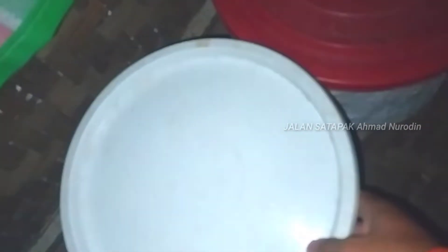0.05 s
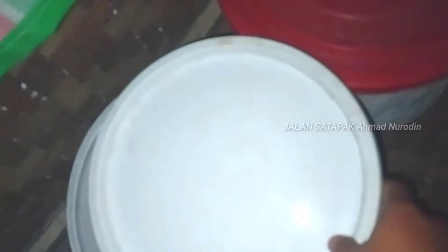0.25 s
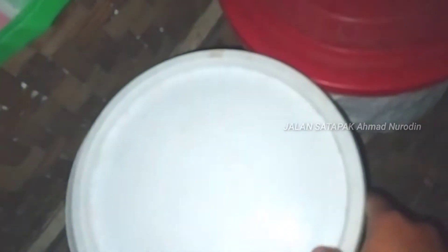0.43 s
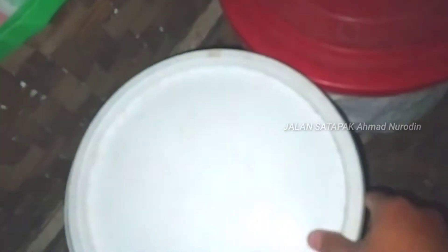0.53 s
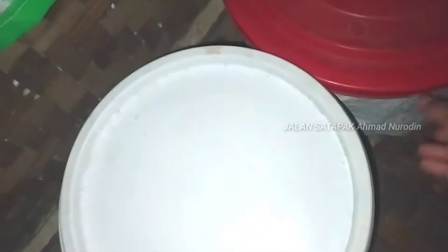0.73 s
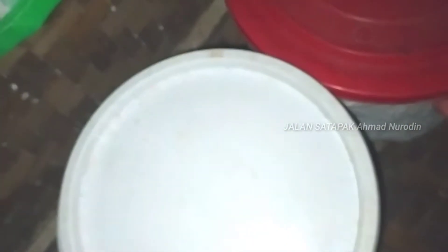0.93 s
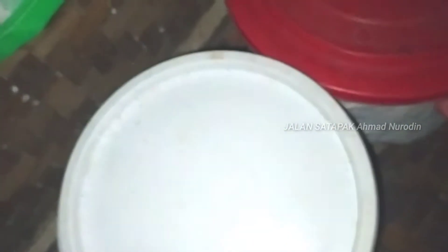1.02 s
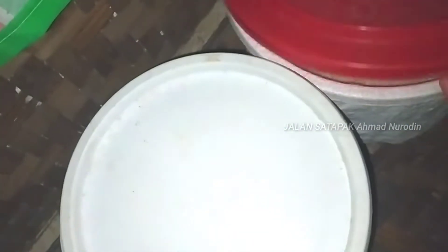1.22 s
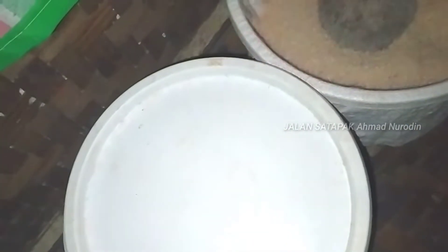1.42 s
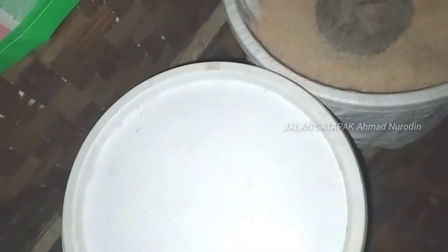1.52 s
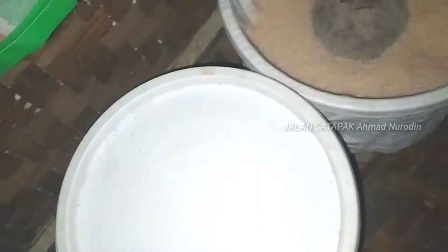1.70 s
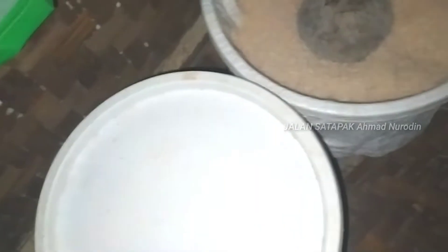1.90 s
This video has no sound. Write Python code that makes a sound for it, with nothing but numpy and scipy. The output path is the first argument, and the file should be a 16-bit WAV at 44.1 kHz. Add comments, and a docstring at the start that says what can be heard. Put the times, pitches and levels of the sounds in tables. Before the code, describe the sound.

Plastic lids knock on storage buckets, close in a small dry room. After near silence, a hollow clack lands at 0.2 s, with scraping and dull drumming around 0.35-0.45 s, then softer bumps until 0.85 s. Faint bright hiss swells near 1 s. Fingers brush at 1.3 s, a lid knocks at 1.37 s, snaps free at 1.44 s and thumps the tub at 1.48 s. Light brushing follows at 1.72 s.

```python
"""A white plastic lid is set down on a bucket, scraped into place and let go; then the red lid of the next
bucket is gripped, snaps off its rim and bumps the tub once. Each contact excites decaying modes and a noisy
clatter; rubbing rims and brushing fingers are shaped noise, and slips of the hand drum on the white lid's modes.
A bright background hiss swells, fades and shifts in side. All is close, in a small dry room with a faint tail
and quiet air."""
import sys
import numpy as np
from scipy import signal
from scipy.fft import rfft, irfft
from scipy.io import wavfile

SR = 44100
rng = np.random.default_rng(int(sys.argv[2]) if len(sys.argv) > 2 else 0)


def bounce(signal):
    """Save signal as a 16-bit WAV file at the path given by the first command-line argument."""
    frames = np.transpose(np.atleast_2d(signal))
    limited = np.clip(frames, -1, 1)
    pcm = np.round(limited * 32767).astype(np.int16)
    wavfile.write(sys.argv[1], SR, pcm)


N = 85995
T = np.arange(N) / SR
BAND_EDGES_HZ = 22 * 2 ** (np.arange(30) / 3)  # third octaves
BAND_CENTRES_HZ = np.sqrt(BAND_EDGES_HZ[1:] * BAND_EDGES_HZ[:-1])

# Likeness of left and right noise: (frequency [Hz], correlation [-1 to 1])
LIKENESS = [(60, 0.66), (200, 0.94), (350, 0.83), (750, 0.12), (1600, -0.07), (3000, 0.019), (9000, 0.034)]
# Room air: (frequency [Hz], relative level per band [dB])
AIR_TONE = [(25, -1.5), (55, -0.5), (95, -2), (160, 6), (300, 2.5), (600, -4.5), (1500, -8.5), (4000, -18),
            (9000, -15), (14000, -6)]
AIR_DB = -58
ROOM_DB, ROOM_T60_S = -21.5, 0.33
# Background hiss that swells, fades and shifts in side: (time [s], level [dB], left-right difference [dB])
HISS = [(0, -55, -0.5), (.06, -56, 1), (.17, -64.5, 0), (.3, -61, 1), (.42, -60, 1), (.57, -54.5, -1),
        (.66, -58, -0.5), (.85, -56, 1.5), (1.01, -50, 5.5), (1.1, -53.5, 4), (1.152, -58, 4.5),
        (1.208, -55, 3), (1.26, -59, 3), (1.4, -58.5, 1), (1.53, -53, 0.5), (1.61, -54.5, 0.5),
        (1.66, -53.5, 2.5), (1.729, -52.5, 2), (1.83, -59, 4), (1.95, -64.5, 1.5)]
# Hiss spectrum: (frequency [Hz], relative level per band [dB])
HISS_TONE = [(200, -14.5), (600, -12.5), (1500, -7.5), (2800, -5), (4500, -6), (6200, -4), (8000, 0),
             (9700, 2.5), (11500, 1.5), (14500, -8)]
# The bucket rocks on the floor as the lid is pushed about: (time [s], level [dB])
RUMBLE = [(.21, -70), (.23, -60), (.29, -72), (.39, -64), (.46, -76), (.56, -59), (.64, -43), (.77, -57),
          (.83, -63), (.9, -61)]
# Rumble spectrum: (frequency [Hz], relative level per band [dB])
RUMBLE_TONE = [(25, -12), (50, -2), (80, -17), (110, 15), (200, -6), (1000, -84)]

# Brushes of the fingers: (time [s], Gaussian width [s], noise level [dB], low bump level [dB])
BRUSHES = [(1.301, .011, -47.5, -48), (1.721, 0.0074, -46.5, -74), (1.755, 0.021, -56.5, -55)]
# Brush spectrum: (frequency [Hz], relative level per band [dB])
BRUSH_TONE = [(100, -18), (300, -2.5), (650, 3), (1000, -5), (1600, 0.5), (3000, -25), (9000, -2),
              (14000, -8)]
BUMP_HZ, BUMP_LAG_S, BUMP_WIDTH_S = 53, 0.0075, 0.013

# Rim rubbing on rim: (time [s], level [dB])
SCRAPE = [(.335, -59), (.346, -46.5), (.365, -47), (.385, -39.5), (.403, -50.5), (.414, -36), (.430, -43.5),
          (.45, -55.5), (.48, -75)]
# Scrape spectrum: (frequency [Hz], relative level per band [dB])
SCRAPE_TONE = [(60, -4), (170, -11.5), (320, 0.5), (500, -1.5), (1000, 5), (1700, 6), (2900, 4.5),
               (4000, -34), (9000, -8), (14000, -39)]
GRIT_DB, GRIT_PER_S = 5.5, 440  # spread and rate of the friction's random unevenness
CATCHES_PER_S, CATCH_DB, FRICTION_DB = 500, -14.5, 2  # levels relative to the scrape curve

# The lid shifts under the hand: (time [s], level of the slips [dB])
SLIDE = [(.32, -95), (.35, -39), (.38, -25.5), (.42, -38.5), (.48, -52), (.55, -44.5), (.59, -42),
         (.68, -45.5), (.73, -48), (.77, -57.5), (.83, -46), (.90, -79), (1.1, -70), (1.16, -63.5),
         (1.28, -80)]
SLIPS_PER_S, SLIP_SPREAD_DB, SLIDE_SOFT_HZ = 390, 2, 227

# Red panel popping through as it comes free
POP_S, POP_HZ, POP_DB, POP_T60_S = 1.4428, 272, -11, .026

# Centres of a knock's thump, body, clack and tick: [Hz]
KNOCK_TONE_HZ = [170, 650, 1800, 7000]
# The white lid lands and rocks: (time [s], thump [dB], body [dB], clack [dB], tick [dB])
WHITE_KNOCKS = [(.2133, -21.5, -23.5, -21.5, -49.5), (.2205, -33.5, -30.5, -31, -46),
                (.2408, -32, -37.5, -33, -42.5), (.3435, -36, -36, -38.5, -58),
                (.356, -29, -32.5, -68, -70), (.3858, -47, -33.5, -40.5, -35), (.410, -30, -55, -65, -62),
                (.428, -31.5, -35, -81, -55), (.4595, -63, -49, -64, -44.5), (.5152, -36, -32, -41.5, -65),
                (.600, -42.5, -40, -56, -55), (.645, -43, -55, -49, -65), (.688, -37, -49, -64, -62),
                (.728, -60, -67, -56.5, -54), (.780, -39.5, -65, -53, -60), (.816, -34, -54.5, -71, -73)]
# The red lid is touched, snaps free, bumps the tub: (time [s], thump [dB], body [dB], clack [dB], tick [dB])
RED_KNOCKS = [(1.185, -51, -59, -67, -60), (1.3668, -33, -40, -37.5, -53), (1.440, -30, -31, -36.5, -24),
              (1.4803, -17.5, -23, -27, -64), (1.4995, -34, -33, -44.5, -49), (1.512, -42, -36.5, -51, -68)]
# Modes of the white lid on its bucket: (frequency [Hz], relative level [dB], t60 [s])
WHITE_MODES = [(127.2, -9.5, 0.17), (161, -4.5, 0.16), (180.5, 2, .12), (316, -1, 0.1), (413, -15, 0.12),
               (464, -7, 0.079), (683, -2, 0.044), (772.4, -2, 0.061), (809, -7.5, 0.081), (958, -8, 0.049),
               (1149, -2.5, 0.031), (1446, -14, 0.02), (1495, -12, 0.02), (1666, -11, 0.029)]
# Modes of the red lid on its bucket: (frequency [Hz], relative level [dB], t60 [s])
RED_MODES = [(124.5, -8, 0.16), (164.5, -1.5, 0.12), (211, -8.5, 0.17), (329.6, -5, 0.1), (387, -9.5, 0.13),
             (485, -9, 0.068), (549, -14, 0.19), (685, -5.5, 0.07), (742, -1.5, 0.051), (804, -23, 0.12),
             (1103, -6.5, 0.034), (1510, -32, 0.052), (2050, -22, 0.13), (2540, -1, 0.024)]
BUILD_CYCLES = 0.7  # time constant of a mode's build-up, in its own cycles
MODE_PAN_DB, MODE_SKEW_RAD_PER_KHZ = -2.0, 0.99  # left-right level; spread of left-right phase
# Crowded upper modes of the thin plastic: (frequency [Hz], relative level per band [dB])
CLATTER = [(40, -35), (100, -30), (250, -9), (600, -13.5), (1200, -10.5), (2000, -10), (3000, -11),
           (4200, -14.5), (5500, -11.5), (9000, -10.5), (11000, -16.5), (14000, -46)]
# Clatter decay: (frequency [Hz], t60 [s])
CLATTER_T60 = [(100, 0.15), (600, 0.15), (1800, 0.063), (4000, 0.098), (9000, 0.082)]
# Extra strength of the first instant, most in the treble: (frequency [Hz], relative level [dB])
CRACK = [(500, 8), (1500, 2), (4000, 6), (9000, 8.5)]
CRACK_DB, CRACK_S = 2.5, 0.0012  # added to the crack table; time constant
CLACK_HZ, CLACK_DB, CLACK_T60_S = 1315, 8.5, 0.011  # level relative to the contact's clack
TICK_BAND_HZ, TICK_LAG_S = (7900, 8200), 0.00017
TICK_DB = 33  # impulse relative to the contact's tick, before the band filter
BASS_LAG_S, BASS_BELOW_HZ = 0.00719, 226.2  # the lid's low modes begin to sound a little after the rim is struck

MIC_PEAK_HZ, MIC_PEAK_ADDED_DB = 9190, -1.5  # presence peak: gain added to unity
MIC_EDGE_HZ, MIC_TOP_DB, CUTOFF_HZ = 10900, -5.5, 15550  # step down, then steep cut


def from_db(db):
    """Decibel law: twenty decibels are a tenfold amplitude."""
    return 10 ** (np.asarray(db) / 20)


def rms_one(x):
    """Power normalisation: the mean square becomes one."""
    return x / np.sqrt(np.mean(x ** 2) + 1e-20)


def at_hz(points, hz):
    """Logarithmic pitch scale: a table is interpolated along log frequency."""
    table_hz, values = np.transpose(points)
    return np.interp(np.log(hz), np.log(table_hz), values)


def level(rows):
    """Amplitude envelope: gain follows a decibel curve and is silent outside it."""
    s, db = np.transpose(rows)[:2]
    inside = (T >= s[0]) * (T <= s[-1] + .01)
    return from_db(np.interp(T, s, db)) * inside


def panned(db):
    """Interaural level difference: half the decibels go to each side, with opposite sign."""
    return from_db(np.array([[.5], [-.5]]) * db)


def bandpass(band_hz):
    """Band limitation: a second-order Butterworth design passes one range."""
    return signal.butter(2, band_hz, "band", fs=SR, output="sos")


def noise_bands():
    """Partial coherence: mid and side noises mix to a set left-right correlation in each third octave."""
    white = rng.standard_normal((2, 2, N + SR // 4))
    bands = []
    for k, hz in enumerate(BAND_CENTRES_HZ):
        # neighbouring bands use different noise; the filter's start is discarded
        mid, side = signal.sosfilt(bandpass(BAND_EDGES_HZ[k:k + 2]), white[k % 2])[:, -N:]
        alike = np.clip(at_hz(LIKENESS, hz), -1, 1)
        stereo = np.sqrt(1 + alike) * mid + np.sqrt(1 - alike) * side * [[1], [-1]]
        bands.append(rms_one(stereo))
    return np.array(bands)


def coloured(bands, tone):
    """Spectral weighting: noise bands sum to a given spectrum at unit power."""
    return rms_one(np.tensordot(from_db(at_hz(tone, BAND_CENTRES_HZ)), bands, 1))


def ringing(t, hz, t60):
    """Damped resonance: a mode builds over a cycle or so, then decays exponentially."""
    return (1 - np.exp(-t * hz / BUILD_CYCLES)) * from_db(-60 * t / t60)


def air(bands):
    """Stationary noise: the room's air has a constant level and a fixed spectrum."""
    backwards = bands[:, :, ::-1]  # time reversed, so it does not copy the swelling hiss
    return from_db(AIR_DB) * coloured(backwards, AIR_TONE)


def room(x):
    """Diffuse reverberation: the source is convolved with decaying noise, different in each channel."""
    t = T[:SR // 2]
    tail = rng.standard_normal((2, len(t))) * from_db(-60 * t / ROOM_T60_S)
    tail = tail / np.linalg.norm(tail[0])
    return from_db(ROOM_DB) * signal.fftconvolve(x, tail, axes=1)[:, :N]


def swelling_hiss(bands):
    """Amplitude modulation: bright background noise swells and fades, and shifts in side."""
    s, _, pan_db = np.transpose(HISS)
    return level(HISS) * panned(np.interp(T, s, pan_db)) * coloured(bands, HISS_TONE)


def rumble(bands):
    """Low-frequency noise: the bucket rocking on the floor swells and fades."""
    return level(RUMBLE) * coloured(bands, RUMBLE_TONE)


def brushes(bands):
    """Sliding contact: fingers make Gaussian noise bursts and nudge the tub into low swings."""
    rubbing = coloured(bands, BRUSH_TONE)
    out = 0
    for s, width, db, bump_db in BRUSHES:
        late = T - s - BUMP_LAG_S
        bump = np.sin(2 * np.pi * BUMP_HZ * late) * np.exp(-.5 * (late / BUMP_WIDTH_S) ** 2)
        burst = rubbing * np.exp(-.5 * ((T - s) / width) ** 2)
        out = out + from_db(db) * burst + from_db(bump_db) * bump
    return out


def scrape(bands):
    """Dry friction: two rims give unevenly modulated noise and random tiny catches."""
    grit = np.interp(T * GRIT_PER_S, np.arange(N), rng.standard_normal(N))
    friction = rms_one(from_db(GRIT_DB * grit)) * coloured(bands, SCRAPE_TONE)
    catches = (rng.random(N) < CATCHES_PER_S / SR) * rng.standard_normal((2, N))
    catches = rms_one(signal.sosfilt(bandpass((1000, 3200)), catches + 1e-18))
    return level(SCRAPE) * (friction * from_db(FRICTION_DB) + catches * from_db(CATCH_DB))


def slide():
    """Stick-slip excitation: random soft jolts drum on the white lid's modes."""
    slips = (rng.random(N) < SLIPS_PER_S / SR) * rng.choice([-1, 1], N)
    slips = slips * from_db(SLIP_SPREAD_DB * rng.standard_normal(N))
    t = T[:SR // 4]
    body = 0
    for hz, db, t60 in WHITE_MODES:
        gain = from_db(db) / np.hypot(1, hz / SLIDE_SOFT_HZ)  # soft jolts excite less treble
        body = body + gain * ringing(t, hz, t60) * np.sin(2 * np.pi * hz * t)
    body = body / np.linalg.norm(body)
    drumming = signal.fftconvolve(rms_one(slips) * level(SLIDE), body)[:N]
    return drumming * panned(MODE_PAN_DB)


def pop():
    """Snap-through: the released panel flips with a few damped swings."""
    t = np.maximum(T - POP_S, 0)
    return from_db(POP_DB) * ringing(t, POP_HZ, POP_T60_S) * np.sin(2 * np.pi * POP_HZ * t)


def tick(t, db):
    """Impulse response: a bright band-passed click reaches the right channel a little later."""
    impulse = np.sinc((t - np.array([[0], [TICK_LAG_S]])) * SR)
    return from_db(db + TICK_DB) * signal.sosfilt(bandpass(TICK_BAND_HZ), impulse)


def clack(t, db):
    """Heavily damped resonance: the rim gives a few fast swings right at the contact."""
    return from_db(db + CLACK_DB) * ringing(t, CLACK_HZ, CLACK_T60_S) * np.sin(2 * np.pi * CLACK_HZ * t)


def since_arrival(t, hz):
    """Frequency-dependent delay: the bass begins to sound after the treble."""
    return np.maximum(t - BASS_LAG_S / (1 + (hz / BASS_BELOW_HZ) ** 4), 0)


def lid_modes(t, modes, tone):
    """Modal superposition: the lid rings as a sum of damped sines weighted by the knock's tone."""
    sound = np.zeros((2, len(t)))
    for hz, db, t60 in modes:
        late = since_arrival(t, hz)
        skew = rng.standard_normal() * MODE_SKEW_RAD_PER_KHZ * hz / 1000
        phase = np.array([[.5], [-.5]]) * skew
        gain = 2 * from_db(db + at_hz(tone, hz)) * panned(MODE_PAN_DB)
        sound += gain * ringing(late, hz, t60) * np.sin(2 * np.pi * hz * late + phase)
    return sound


def clatter(t, tone, bands):
    """High modal density: crowded upper modes merge into decaying noise with a stronger first instant."""
    sound = np.zeros((2, len(t)))
    pick = rng.integers(N - len(t))  # a random stretch of noise for each knock
    for hz, band in zip(BAND_CENTRES_HZ, bands):
        late = since_arrival(t, hz)
        crack = 1 + from_db(CRACK_DB + at_hz(CRACK, hz)) * np.exp(-late / CRACK_S)
        gain = from_db(at_hz(CLATTER, hz) + at_hz(tone, hz)) * crack
        sound += gain * ringing(late, hz, at_hz(CLATTER_T60, hz)) * band[:, pick:pick + len(t)]
    return sound


def knocks(rows, modes, bands):
    """Impact excitation: each contact ticks, clacks, rings the lid's modes and clatters."""
    out = np.zeros((2, N))
    for s, *tone_db in rows:
        start = int(s * SR)
        t = T[:min(SR // 4, N - start)]
        tone = list(zip(KNOCK_TONE_HZ, tone_db))
        sound = tick(t, tone_db[-1]) + clack(t, at_hz(tone, CLACK_HZ))
        sound += lid_modes(t, modes, tone) + clatter(t, tone, bands)
        out[:, start:start + len(t)] += sound
    return out


def scene():
    """Linear superposition: lids, hand, bucket, room, background hiss and air add together."""
    contact, background = noise_bands(), noise_bands()
    lids = knocks(WHITE_KNOCKS, WHITE_MODES, contact) + knocks(RED_KNOCKS, RED_MODES, contact) + pop()
    lids = lids + slide() + scrape(contact) + brushes(contact) + rumble(contact)
    return lids + room(lids) + swelling_hiss(background) + air(background)


def record(dry):
    """Transducer response: a small microphone has a treble peak, a weak top and a steep cut above."""
    hz = np.fft.rfftfreq(2 * N, 1 / SR)
    peak = 1 + from_db(MIC_PEAK_ADDED_DB) / (1 + ((hz - MIC_PEAK_HZ) / 700) ** 2)
    step = from_db(MIC_TOP_DB * .5 * (1 + np.tanh((hz - MIC_EDGE_HZ) / 600)))
    heard = irfft(rfft(dry, 2 * N) * peak * step)[:, :N]
    steep_cut = signal.ellip(12, .1, 90, CUTOFF_HZ, fs=SR, output="sos")
    return signal.sosfilt(steep_cut, heard)


dry = scene()
out = record(dry)
bounce(out)
```